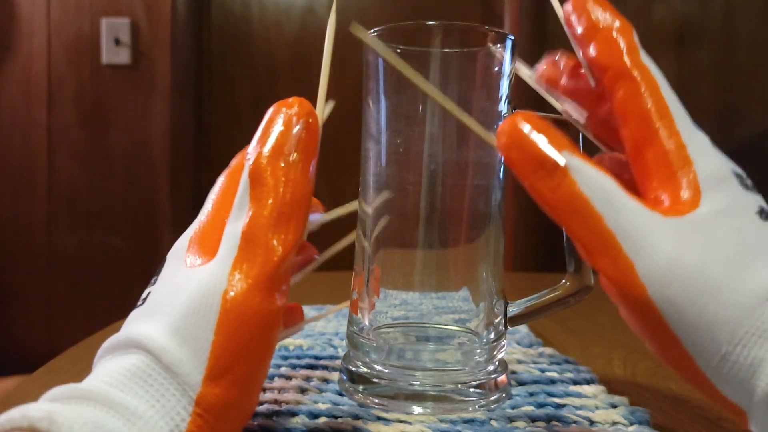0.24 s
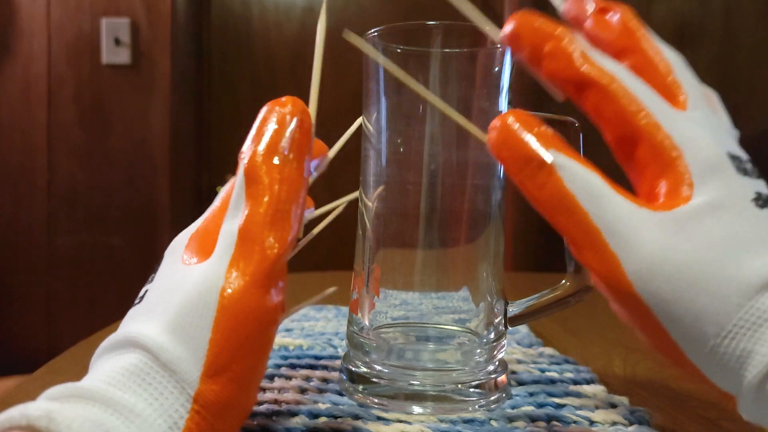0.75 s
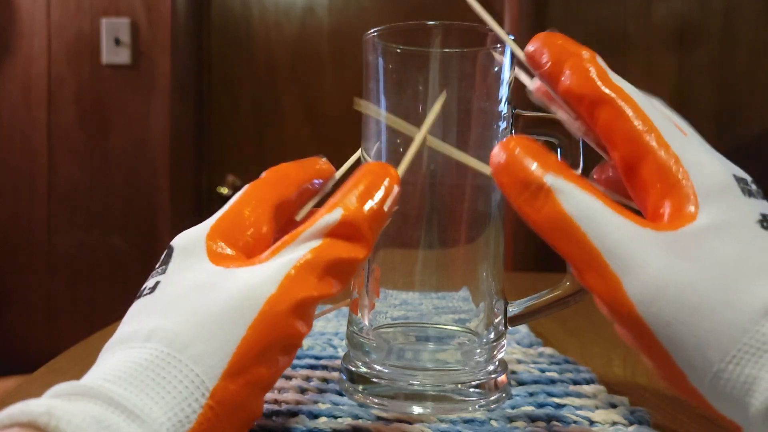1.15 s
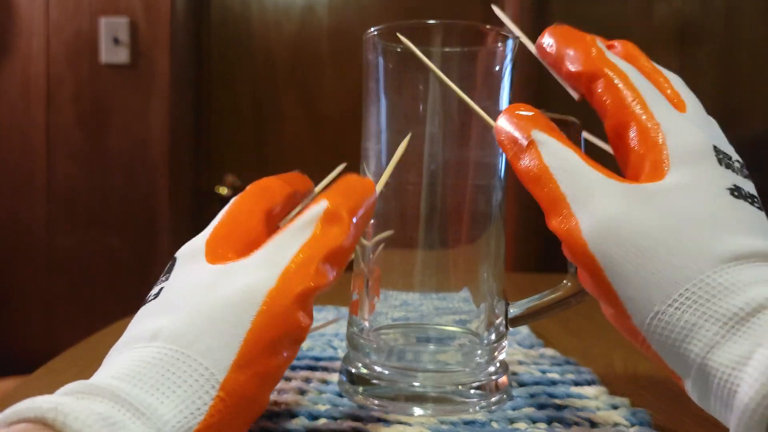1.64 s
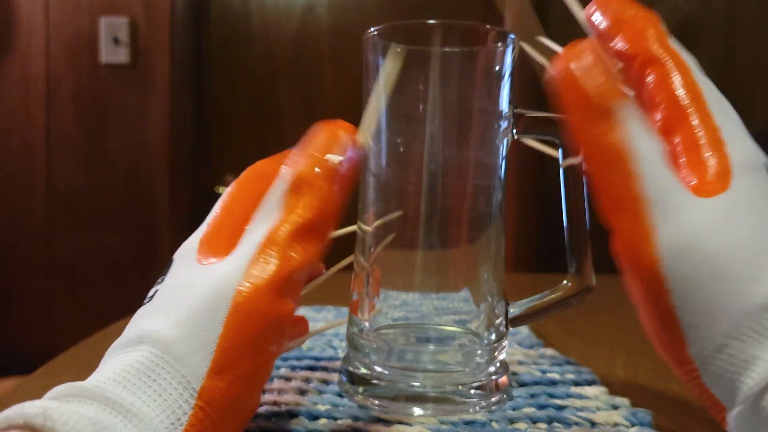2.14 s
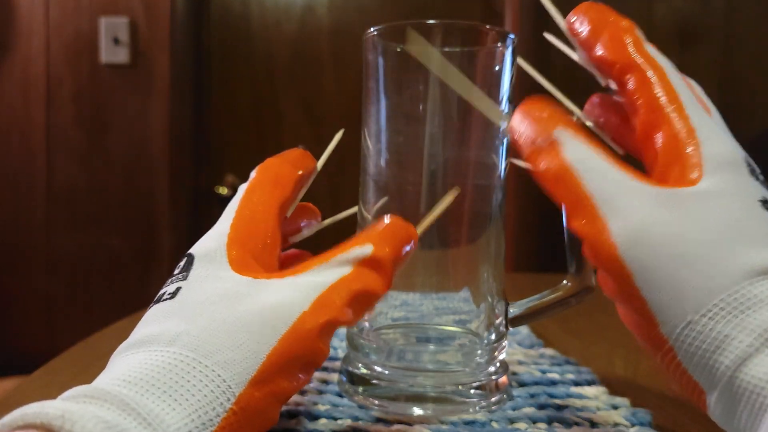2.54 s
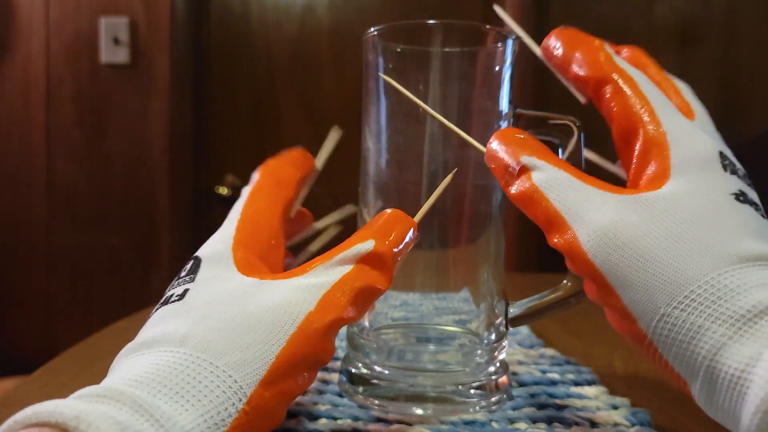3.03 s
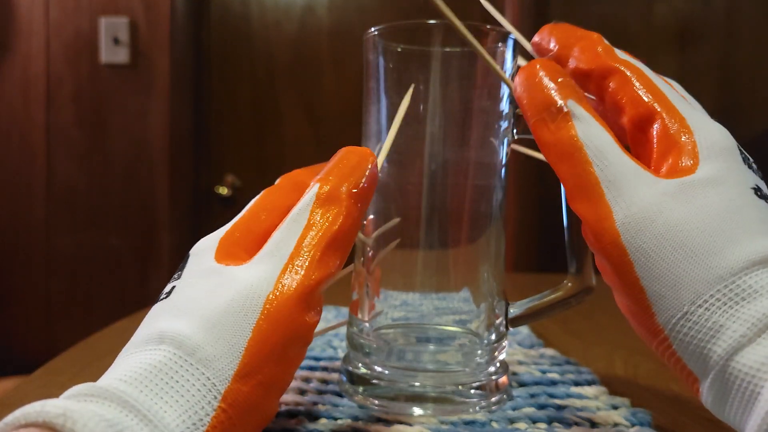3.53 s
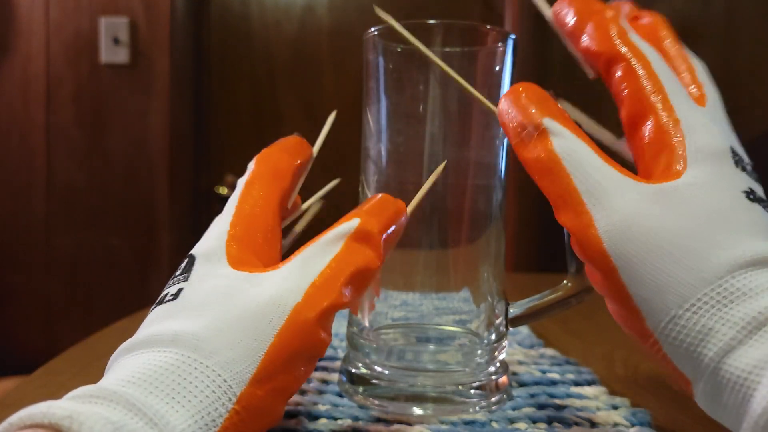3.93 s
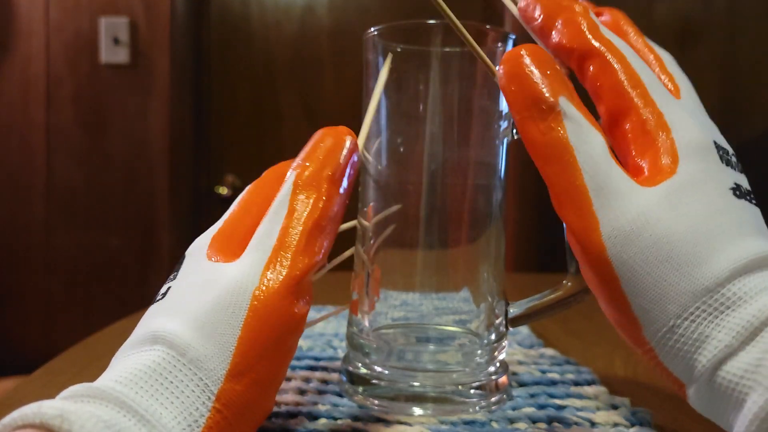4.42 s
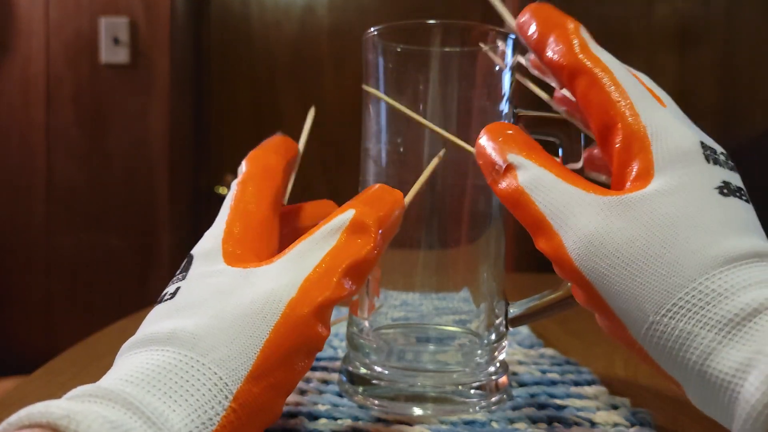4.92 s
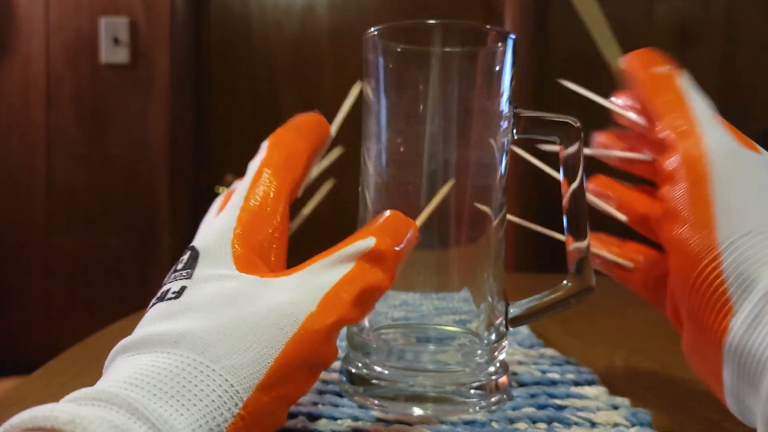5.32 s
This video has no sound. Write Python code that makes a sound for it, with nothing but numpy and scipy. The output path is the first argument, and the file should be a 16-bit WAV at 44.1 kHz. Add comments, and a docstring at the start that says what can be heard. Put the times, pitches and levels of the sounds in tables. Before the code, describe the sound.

Wooden toothpicks on gloved fingertips tap an empty glass mug, close to a stereo microphone in a small quiet room, for about 5.6 seconds. A firm dry crack opens the sound, followed by quick taps at 0.25-0.5 and one at 0.65. A busy cluster runs from 0.9 to 1.4, with small chattering skids along the wall. From 1.6 to 2.7 the taps are sparser and often softer, then a loose group gathers around 2.7-3.0. Strong bursts come near 3.3, 3.7, 4.0, 4.3, 4.5 and 4.85-5.0, some with a tiny scrape or a dull low bump through the mat. Taps at 5.2 and a final sharp cluster near 5.55 end it. Each contact is a tight double woody click; the glass answers with a clear note near 2.4 kHz and shifting bright overtones, fading within a few tenths of a second. Short room reflections, faint rumble and hiss remain behind.

```python
"""Dry wooden cracks and clear glassy notes: toothpicks fixed to gloved fingertips drum on an empty glass mug,
close to a stereo microphone in a small quiet room. Each contact is a double noise burst with the brief bending
ring of the stick. The taps, faint or loud, excite decaying modes of the mug: a note near 2.4 kHz under overtones
that change with the spot struck. Runs of tiny clicks are skids along the wall; dull bumps pass through the mat.
A short noise tail forms the room, and shaped noise its faint rumble and hiss."""
import sys
import numpy as np
from scipy import signal
from scipy.fft import rfft, irfft
from scipy.io import wavfile

SR = 44100
rng = np.random.default_rng(int(sys.argv[2]) if len(sys.argv) > 2 else 0)


def materialize(psi):
    """Save the field psi as 16-bit PCM at rate SR to the path in sys.argv[1].

    A 1-D psi becomes a single channel; in a 2-D psi each row is a channel.
    """
    bounded = np.clip(np.atleast_2d(psi).T, -1, 1)
    quanta = np.round(bounded * 32767).astype(np.int16)
    wavfile.write(sys.argv[1], SR, quanta)


N = 245637  # length in samples

# taps with a glass level and a spot of their own; levels are relative, depth runs from rim (0) to foot (1):
# [start_s, knock_hz, click_db, brightness_db, glass_db, depth_below_rim, nearness_to_handle (0-1)]
PLACED_TAPS = [(0.0012, 1580, -14, 3.5, -31, 0.42, 0.82), (0.236, 1260, -25.5, -0.5, -26.5, 0.7, 0.5),
               (0.2943, 1625, -13, 1.5, -35.5, 0.24, 0), (0.3998, 1560, -12, 10, -34, 1, 0.88),
               (0.6516, 1650, -10.5, 6, -34, 0.16, 0.76), (0.911, 1210, -35.5, -12.5, -37, 0.36, 0.84),
               (0.955, 1200, -15.5, 4, -28.5, 0.37, 0.3), (1.0497, 1540, -20, 4.5, -34, .59, 0.5),
               (1.1262, 1510, -17, 15, -30, .34, 0), (1.167, 1280, -24, 1, -43, 0.17, 0.8),
               (1.3524, 1880, -32.5, 2, -43.5, 0.62, 0.86), (1.6333, 1252, -19.5, 0.5, -33, 0.19, 0),
               (1.8814, 1620, -23, 2, -34.5, 0.4, 0.7), (1.9382, 1280, -34.5, -4, -38, 0.4, 0),
               (2.005, 1050, -31, 7.5, -46.5, .97, 0.3), (2.2563, 1290, -34.5, -0.5, -54.5, 0.09, 0.78),
               (2.474, 1200, -27.5, -1, -24.5, 0.35, 0.66), (2.488, 1360, -24, 1, -33, 0.07, 0.4),
               (2.6828, 1890, -36.5, -6, -48, 0.14, 1), (2.745, 1614, -17, 2, -49, 0.98, 0.46),
               (2.879, 1544, -32, -3, -45, 0.33, 0), (2.9945, 1460, -22.5, -3.5, -48.5, 0, 0.5),
               (3.2553, 1267, -20, 2.5, -27.5, 0.22, 1), (3.2815, 1700, -14.5, 6.5, -26.5, 0.33, 0),
               (3.3685, 1620, -13, -2, -36, 0.22, 0.8), (3.6432, 920, -58, -8, -51.5, 0.23, 1),
               (3.7322, 1280, -15, -2.5, -31, 0.19, 0.1), (4.0114, 1384, -32, -6.5, -33, 0.12, 1),
               (4.0425, 1607, -14, 8.5, -38, 0.7, 0), (4.276, 1600, -15.5, -5.5, -28.5, 1, 0.77),
               (4.319, 1690, -17, 4.5, -31.5, 0.18, 0), (4.5288, 1490, -13.5, -5, -37.5, .7, 0.76),
               (4.839, 1635, -17, -4, -20.5, .45, 0.54), (4.8923, 1630, -15.5, 4.5, -44, 0.9, 0.1),
               (4.9924, 1720, -21, -4, -30.5, 0.8, 0.63), (5.0221, 1580, -15, 4, -33, 0.06, 0.3),
               (5.2026, 1625, -44, -3, -33.5, .14, 0.66), (5.238, 1438, -21, 3.5, -34.5, 0.35, 0.97),
               (5.537, 1566, -15, 6, -29, 0.3, 0)]
# further stick taps, whose glass ring follows the click level; levels are relative:
# [start_s, knock_hz, click_db, brightness_db]
FURTHER_TAPS = [(0.0073, 1440, -16, 3), (0.2509, 1320, -26.5, -3.5), (0.3531, 1370, -20, 3.5),
                (0.4967, 1120, -45, 14), (1.032, 1400, -31.5, 3.5), (1.0749, 1610, -19, 1),
                (1.2275, 1540, -33.5, -5), (1.2713, 1730, -22.5, -4), (1.3783, 1430, -47, 10),
                (1.4499, 1435, -39, 5.5), (1.6611, 1116, -25, -3.5), (1.932, 1660, -22, 3.5),
                (2.1447, 1545, -49.5, -5), (2.7303, 1470, -26, 2), (2.9361, 1094, -57, 16),
                (2.9786, 1660, -37.5, -7), (3.0111, 1150, -25.5, 0), (3.31, 1646, -17, 4),
                (3.9155, 1170, -51.5, 9), (4.019, 1407, -18.5, -3), (4.3454, 1667, -19, 7.5),
                (4.596, 1180, -30.5, -7.5), (4.8468, 1640, -12.5, 4.5), (4.975, 1642, -23.5, -3.5),
                (5.2566, 1234, -35.5, -11), (5.525, 1706, -26.5, -9), (5.5538, 1730, -12, 3)]


def undb(db):
    """Amplitude ratio from a level: 20 dB is a factor of ten."""
    return 10 ** (np.asarray(db) / 20)


def unit(x):
    """Energy normalisation: the summed square, averaged over the channels, becomes one."""
    energy = np.mean(np.sum(x ** 2, axis=-1))
    return x / np.sqrt(energy + 1e-20)


def band(x, low_hz, high_hz, order=2):
    """Causal band-pass filtering, with the upper edge kept below half the sample rate."""
    edges_hz = [low_hz, min(high_hz, .47 * SR)]
    return signal.sosfilt(signal.butter(order, edges_hz, "band", fs=SR, output="sos"), x)


def pair(size, alike):
    """Interchannel coherence: stereo white noise of which the power share `alike` is common to both sides."""
    white = rng.standard_normal((3, size))
    return np.sqrt(alike) * white[0] + np.sqrt(1 - alike) * white[1:]


def add(out, start_s, sound):
    """Linear superposition: mixes a short sound in at its start time, cut off at the end of the scene."""
    start = int(np.clip(start_s * SR, 0, N - 1))
    out[:, start:start + sound.shape[1]] += sound[:, :N - start]


def room_tone():
    """Stationary background noise: a spectral envelope turns white noise into faint rumble and hiss."""
    # noise spectrum, relative: [frequency_hz, density_db]
    noise_spectrum = [(12, -28), (20, -1.5), (96, 1.5), (172, -10), (367, -10), (499, -15), (2080, -19),
                      (2390, -9.5), (2600, -16.5), (5530, -22), (10800, -29.5), (14700, -20), (16000, -25)]
    hz, db = np.transpose(noise_spectrum)
    bin_hz = np.arange(N // 2 + 1) * SR / N
    shape = undb(np.interp(np.log(bin_hz + 1), np.log(hz), db))
    noise = irfft(rfft(pair(N, alike=0.52)) * shape, N)
    return undb(-61) * np.sqrt(N) * unit(noise)


def contact(knock_hz, knock_db, click_db, edge_db):
    """Impact excitation: a double crack, the bending modes of a thin rod, and scatter from mug, hands and table."""
    crack_decay_s, rise_s, rebound = 0.0011, 0.000067, 0.67
    stick_t60_s, scatter_decay_s = 0.0044, 0.011
    bend_db, scatter_db, thud_db = -1, -10, -20
    t = np.arange(SR // 25) / SR
    rise = 1 - np.exp(-t / rise_s)

    again = t - rng.uniform(.0006, 0.0043)  # the springy tip touches a second time
    first_force = rise * np.exp(-t / crack_decay_s)
    second_force = rebound * (again > 0) * np.exp(-abs(again) / crack_decay_s)
    crack = unit(pair(len(t), alike=0.54) * (first_force + second_force))

    # bending modes rise as odd squares; the free length of the stick sets its pitch
    ratios = np.array([3, 5, 7, 9]) ** 2 / 3 ** 2
    pitches_hz = knock_hz * ratios * np.exp(0.18 * rng.standard_normal(len(ratios)))
    modes = sum(np.sin(2 * np.pi * hz * t + rng.normal(0, 1.886, (2, 1))) for hz in pitches_hz)
    bend = modes * rise * undb(-60 * t / stick_t60_s)

    scatter = unit(pair(len(t), alike=0.11) * np.exp(-t / scatter_decay_s) * (t > .002))
    blow = crack + undb(bend_db) * unit(bend) + undb(scatter_db) * scatter

    centre = blow.mean(axis=0)  # long waves reach both sides alike
    width = 1.573  # frequency ratio from the knock's centre to each band edge
    knock = unit(band(blow + 1.5 * centre, knock_hz / width, knock_hz * width))
    knock = knock + undb(thud_db) * unit(band(centre, 423, 1100))
    click = unit(band(blow, 2240, 9200))
    edge = unit(band(blow, 11400, 14970))
    sound = undb(knock_db) * knock + undb(click_db) * click + undb(edge_db) * edge
    return sound * np.sqrt(SR * .002)  # unit energy becomes unit mean power over 2 ms


def sticks():
    """Spectral balance of impacts: a bright click, made with the very tip, has more edge and less woody knock."""
    out = np.zeros((2, N))
    contacts = [tap[:4] for tap in PLACED_TAPS] + list(FURTHER_TAPS)
    for start_s, knock_hz, click_db, bright_db in contacts:
        knock_db = click_db - 6.5 - bright_db
        edge_db = click_db - 7.5 + bright_db
        add(out, start_s, contact(knock_hz, knock_db, click_db, edge_db))
    return out


def ring(at, strength, hz, t60_s, swell_s):
    """Modal resonance as a complex tone: each blow adds its energy to the decaying mode and kicks its phase."""
    push, kick = np.zeros(N), np.zeros(N)
    push[at] = strength ** 2
    energy_decay = undb(-60 / (t60_s * SR)) ** 2  # per sample
    energy = signal.lfilter([1], [1, -energy_decay], push + 1e-18)
    # a blow turns the phase further the larger its share of the mode's energy
    share = np.clip(push[at] / energy[at], 0, 1)
    kick[at] = rng.choice([-1, 1], len(at)) * np.arcsin(np.sqrt(share))
    swing = np.sqrt(2 * energy) * np.exp(1j * np.cumsum(kick))
    r = np.exp(-1 / (swell_s * SR))  # the wave needs a moment to spread round the wall
    swing = signal.lfilter([1 - r], [1, -r], swing)
    return swing * np.exp(2j * np.pi * hz * np.arange(N) / SR)


def mug():
    """Modal superposition: all taps drive the same modes, and the spot struck changes the share of each."""
    # modes of the mug, in families from low to high; level within the family, pan is left over right:
    # [frequency_hz, level_db, t60_s, pan_db]
    mode_families = [
        [(463, 0, .24, 0)],
        [(2398.6, 0, .375, 1), (2487, -12, .26, -2)],
        [(2690, -10, .07, 2), (2885, -7, .08, -2), (3112, -5, .12, -2), (3154, -5, .24, -3)],
        [(4353, -8, .31, 3)],
        [(5062, -7, .21, -4), (5152, -3, .17, 2), (5188, -9, .12, 0), (5299, -10, .11, 3), (5404, -10, .21, 9),
         (6115, -7, .17, 9), (6216, -14, .08, 0), (6488, -11, .18, -4), (6791, -14, .09, 0)],
        [(7700, -7, .06, 2), (8168, -17, .13, 0), (8905, -10, .13, -3), (9156, -7, .13, 6), (9221, -5, .14, 7),
         (9817, -7, .14, 0), (9984, -7, .09, 6), (10367, -11, .13, -2)],
        [(11730, -16, .13, 0), (12435, -9, .1, 0), (13797, -11, .11, 3), (14822, -5, .1, 5),
         (15236, -9, .12, 6), (15533, -3, .12, -5)],
    ]
    # how the spot struck feeds each family: level at the rim opposite the handle, then gains
    # at the foot and at the handle: [rim_db, foot_db, handle_db]
    spot_feeds = [(-35.5, 1, 19), (10, -36, -2), (-5.5, -11, 11.5), (-7.5, -3, 8), (0, 1.5, -0.5),
                  (-0.5, 3.5, -5.5), (2, 2.5, -9.5)]
    # ring of each family after a further tap, relative to the click: [level_db]
    further_levels = [-50.5, -20.5, -23.5, -26.5, -17, -22, -24]
    spot_spread_db, swell_cycles, fine_wave_hz = 6.5, 7, 5000

    placed_s, _, _, _, glass_db, depth, handle = np.transpose(PLACED_TAPS)
    further_s, _, further_click_db, _ = np.transpose(FURTHER_TAPS)
    at = (np.r_[placed_s, further_s] * SR).astype(int)
    sides = np.array([[.5], [-.5]])  # left, right
    out = np.zeros((2, N))
    for family, (rim_db, foot_db, handle_db), further_db in zip(mode_families, spot_feeds, further_levels):
        placed_db = glass_db + rim_db + foot_db * depth + handle_db * handle
        drive_db = np.r_[placed_db, further_click_db + further_db]
        for k, (hz, level_db, t60_s, pan_db) in enumerate(family):
            # short waves vary more with the spot and with the direction
            fine = min(hz / fine_wave_hz, 1) ** 2
            variation_db = spot_spread_db * fine * rng.standard_normal(len(at))
            strength = undb(drive_db + level_db + variation_db)
            tone = ring(at, strength, hz, t60_s, swell_cycles / hz)
            phase = 1.84 * fine * sides * (-1) ** k  # radians
            out += (tone * undb(pan_db * sides) * np.exp(1j * phase)).real
    return out


def body(x):
    """Resonant filtering: the mug and its cavity give the wooden sounds broad peaks and dips in series."""
    # resonances (positive) and hollows (negative): [frequency_hz, width_hz, gain_db]
    body_modes = [(1418, 71, 4.5), (2852, 420, 7), (4360, 460, 0), (7680, 680, 4), (8440, 600, -3),
                  (10200, 790, -4), (12600, 600, 1.5)]
    for hz, width_hz, db in body_modes:
        resonance = signal.lfilter(*signal.iirpeak(hz, hz / width_hz, fs=SR), x)
        x = x + (undb(db) - 1) * resonance
    return x


def room(x):
    """Diffuse reverberation: convolution with a short, dense tail from wooden walls; the top band dies soonest."""
    # response by band, relative level: [low_hz, high_hz, level_db, t60_s]
    reverb_bands = [(145, 630, -4, 0.15), (930, 4250, -4.5, 0.13), (3243, 8400, -12.5, 0.18),
                    (11500, 40000, -9.5, 0.069)]
    t = np.arange(SR // 3) / SR
    response = 0
    for low_hz, high_hz, db, t60_s in reverb_bands:
        decay = undb(-60 * t / t60_s) * (t > .004)
        tail = band(pair(len(t), alike=0.05) * decay, low_hz, high_hz)
        # energy in proportion to the nominal bandwidth
        response = response + undb(db) * unit(tail) * np.sqrt(2 * (high_hz - low_hz) / SR)
    return signal.fftconvolve(x, response, axes=1)[:, :N]


def skids():
    """Stick-slip friction: a sliding tip catches and slips in a quick random run of tiny contacts, which only click."""
    # sticks chattering along the wall, relative level: [start_s, end_s, level_db]
    skid_runs = [(0.224, 0.278, -31), (0.926, 0.977, -22.5), (1.133, 1.285, -32.5), (3.26, 3.296, -17),
                 (3.707, 3.738, -37), (4.005, 4.055, -35), (4.262, 4.275, -31.5), (4.312, 4.339, -22.5),
                 (4.827, 4.874, -23), (5.511, 5.576, -40)]
    slips_per_s, spread_db = 210, 12
    out = np.zeros((2, N))
    for start_s, end_s, db in skid_runs:
        draws = rng.random(size=(80, 2))
        pitches_hz = rng.uniform(1340, 2000, size=10)
        grains = [contact(hz, db - 10, db, db - 5) for hz in pitches_hz]
        for k, (late, weakness) in enumerate(draws):
            slip_s = start_s + (k + 2 * late) / slips_per_s
            if slip_s < end_s:
                add(out, slip_s, undb(-spread_db * weakness) * grains[k % len(grains)])
    return out


def nudges():
    """Structure-borne sound: the nudged mug sends a dull low bump through the woven mat into the table."""
    # the mug nudged on its mat: [start_s, level_db]
    mat_bumps = [(3.26, -50), (3.733, -50), (4.019, -48), (4.839, -57), (5.524, -48)]
    decay_s = 0.0096
    out, t = np.zeros((2, N)), np.arange(SR // 5) / SR
    for start_s, db in mat_bumps:
        burst = pair(len(t), alike=0.65) * np.exp(-t / decay_s)
        bump = band(band(burst, 49, 124, order=1), 40, 700)
        add(out, start_s, undb(db) * unit(bump) * np.sqrt(SR * decay_s))
    return out


def scene():
    """Direct and reverberant sound: wood and glass close by, the room behind them."""
    wood = body(undb(-3.0) * sticks() + skids())
    glass = undb(-2.0) * mug()
    direct = wood + glass + nudges()
    reverberant = room(wood + undb(-10) * glass)
    return direct + reverberant + band(room_tone(), 35, 20000, order=1)


def record(dry):
    """Band limiting: a steep elliptic low-pass cuts the top above 15.9 kHz."""
    low_pass = signal.ellip(10, .2, 70, 15900, fs=SR, output="sos")  # order, ripple dB, rejection dB, Hz
    return signal.sosfilt(low_pass, dry)


dry = scene()
out = record(dry)
materialize(out)
```